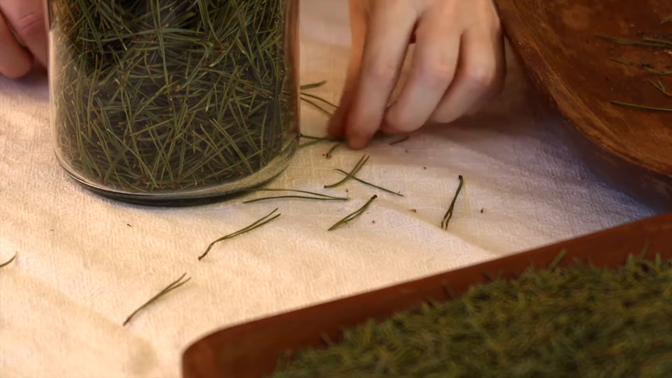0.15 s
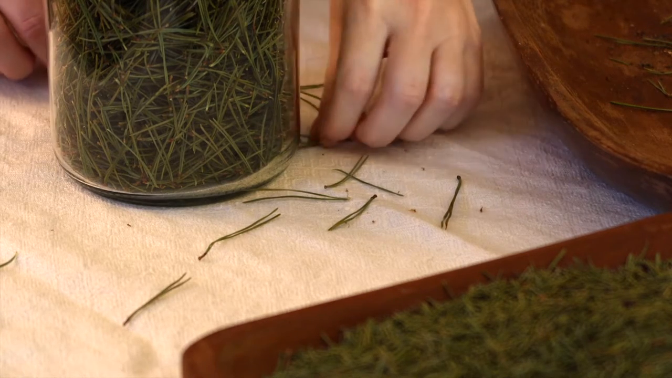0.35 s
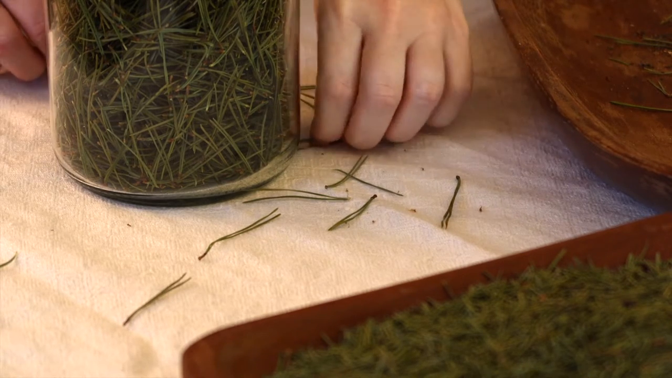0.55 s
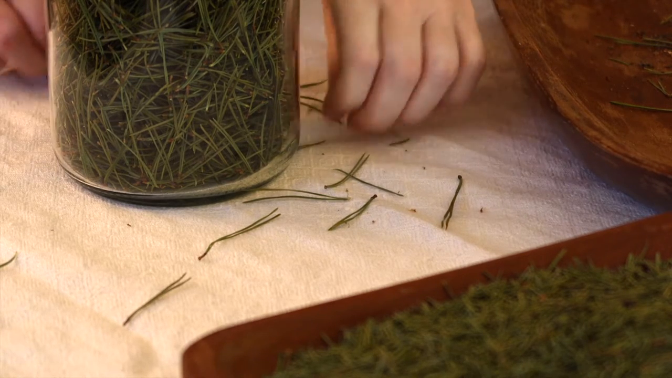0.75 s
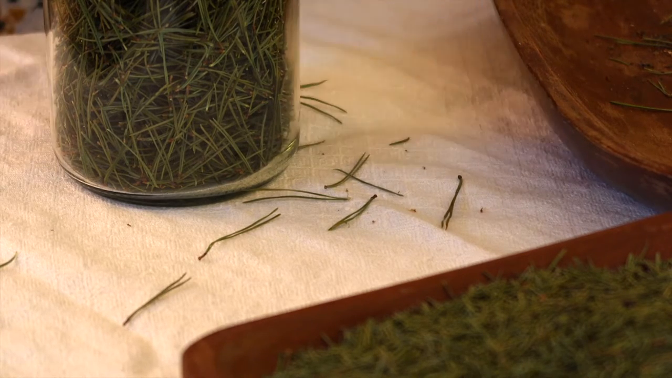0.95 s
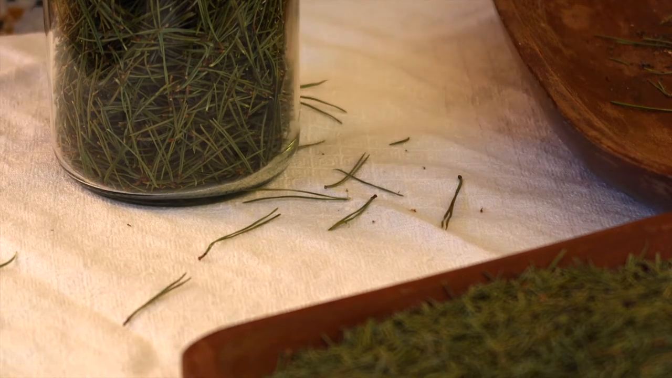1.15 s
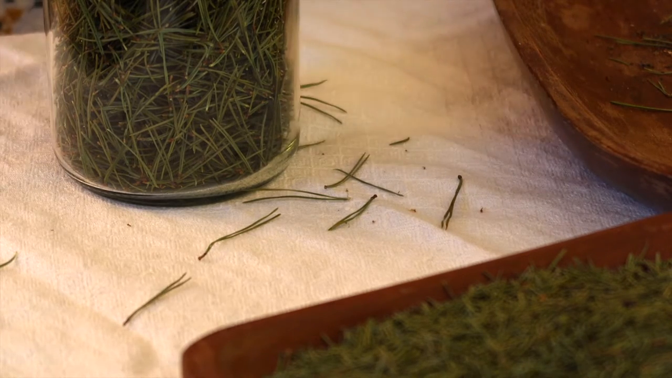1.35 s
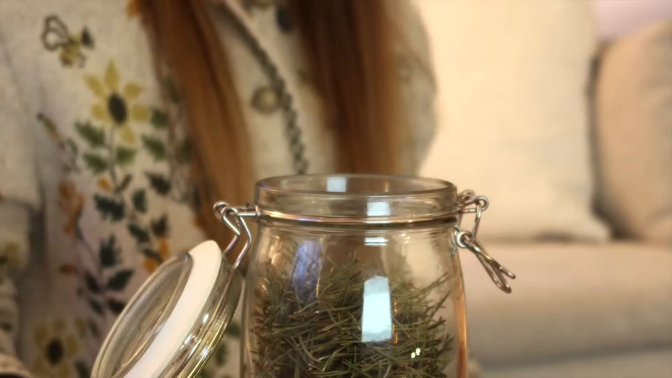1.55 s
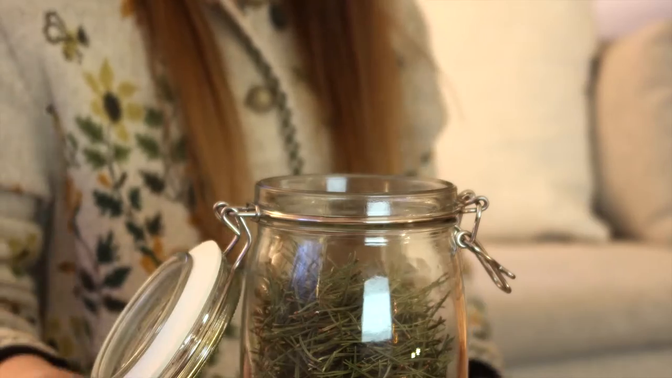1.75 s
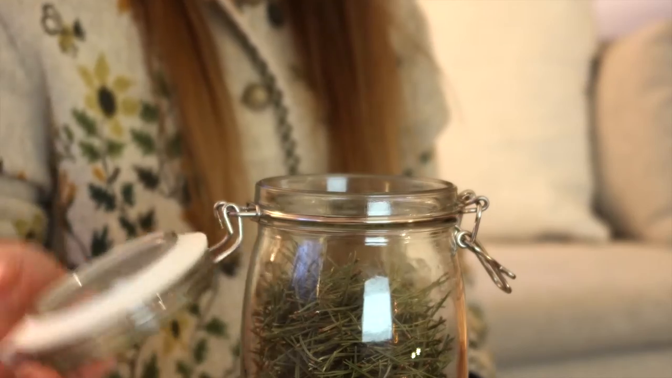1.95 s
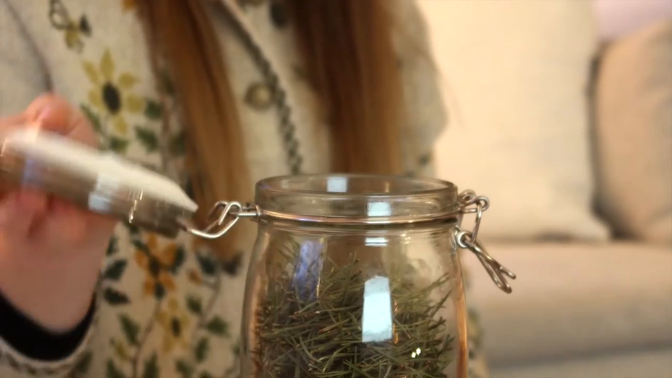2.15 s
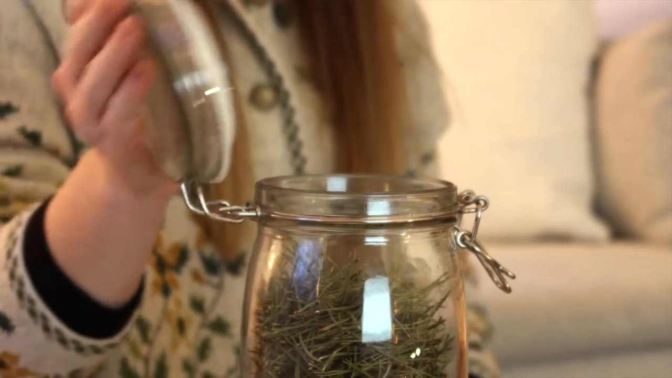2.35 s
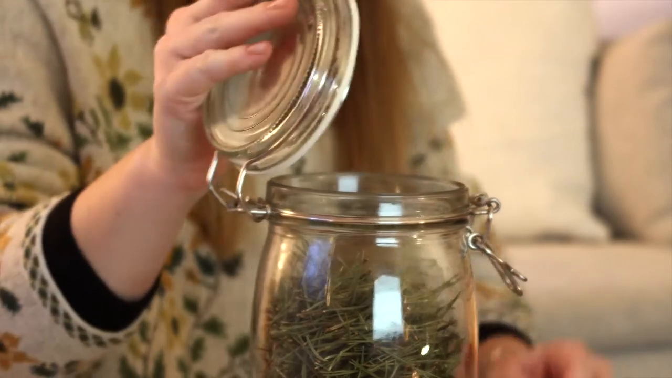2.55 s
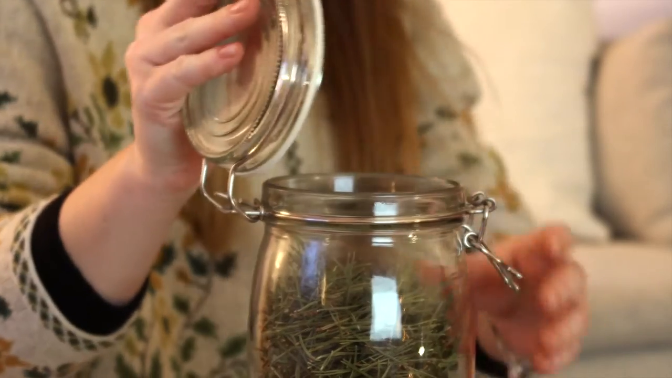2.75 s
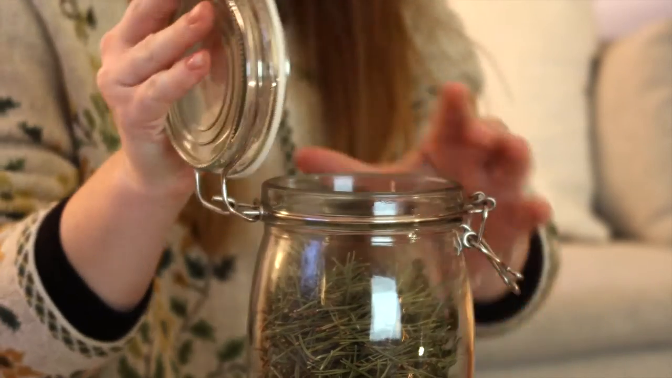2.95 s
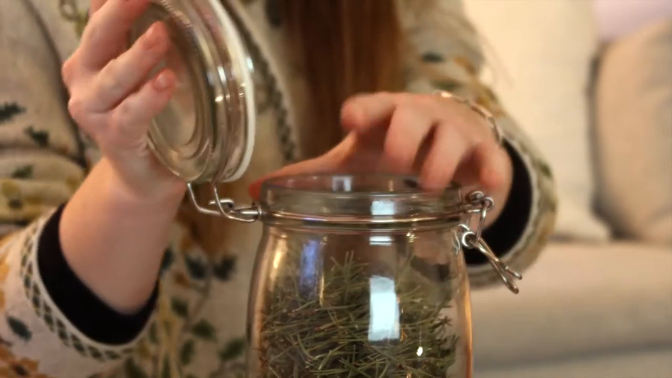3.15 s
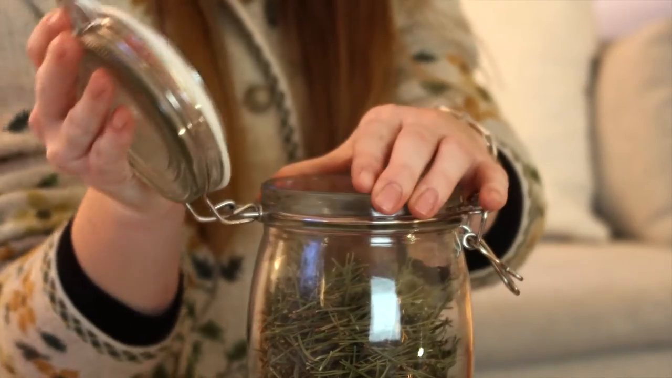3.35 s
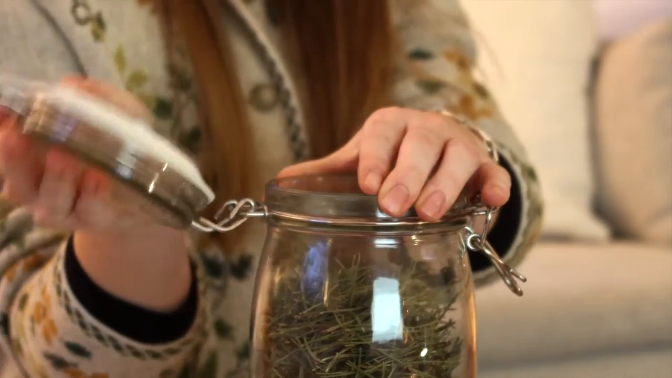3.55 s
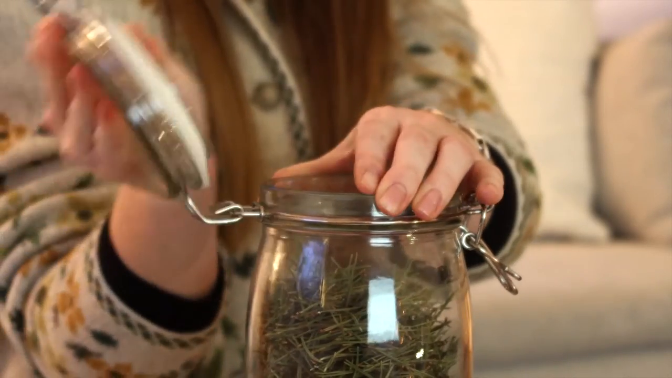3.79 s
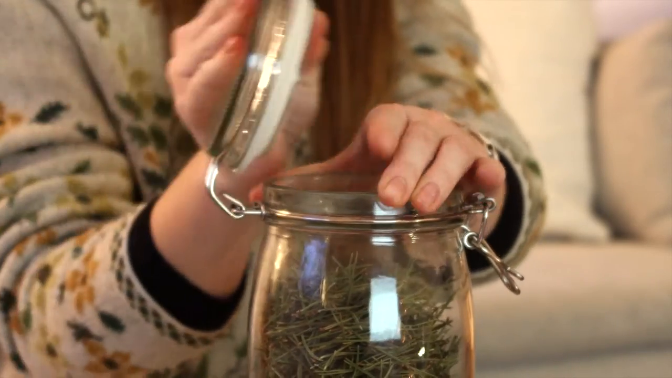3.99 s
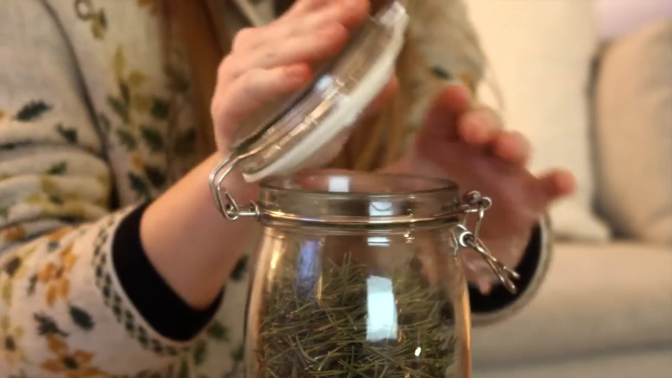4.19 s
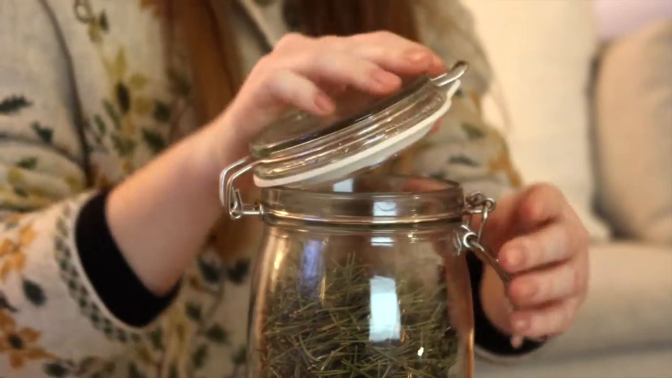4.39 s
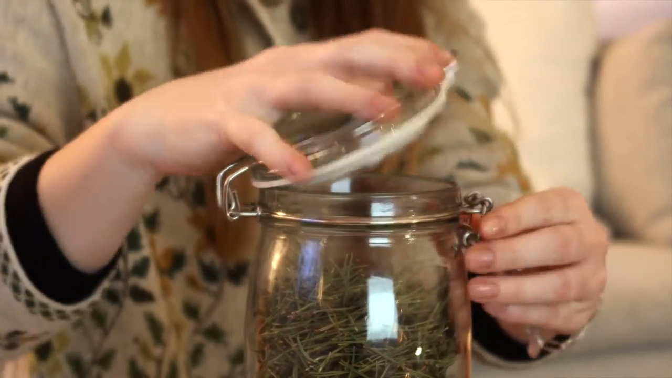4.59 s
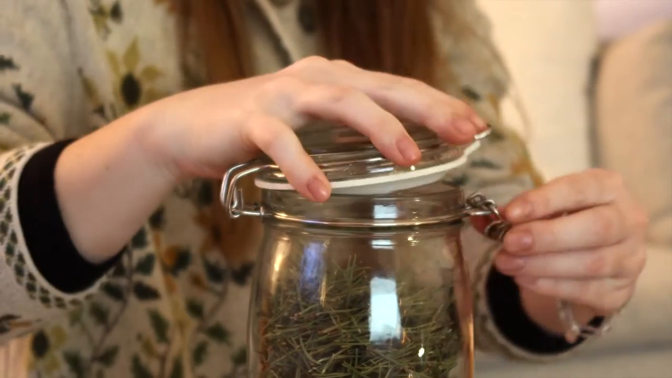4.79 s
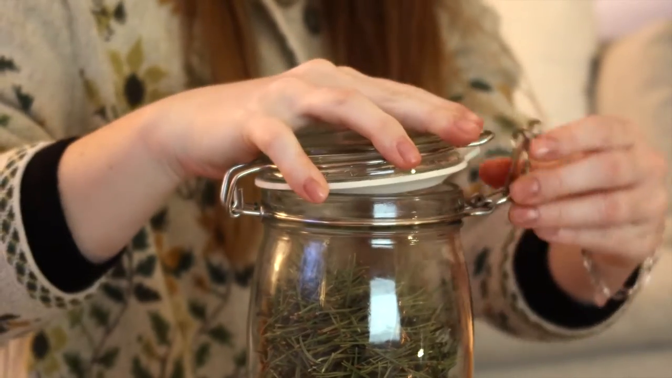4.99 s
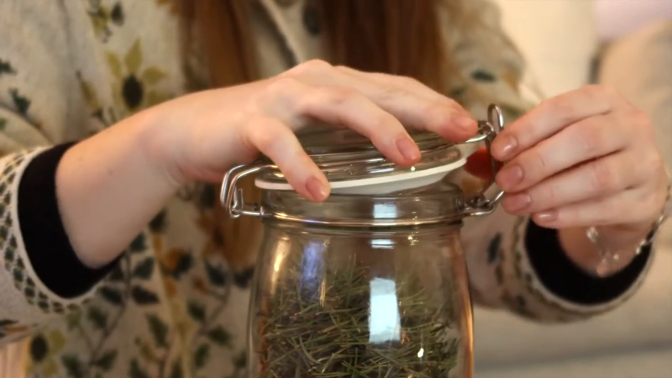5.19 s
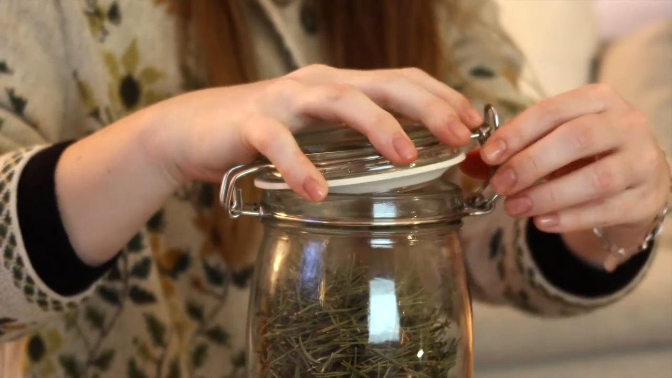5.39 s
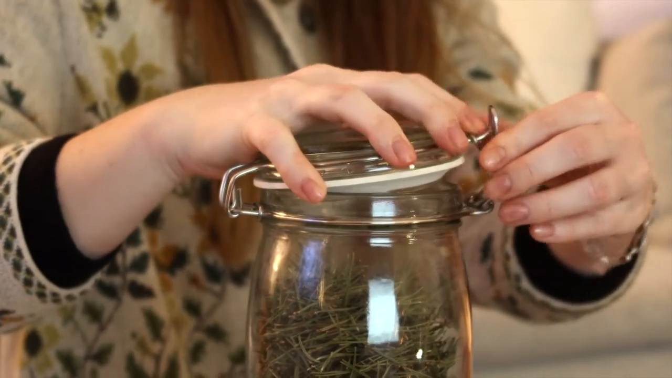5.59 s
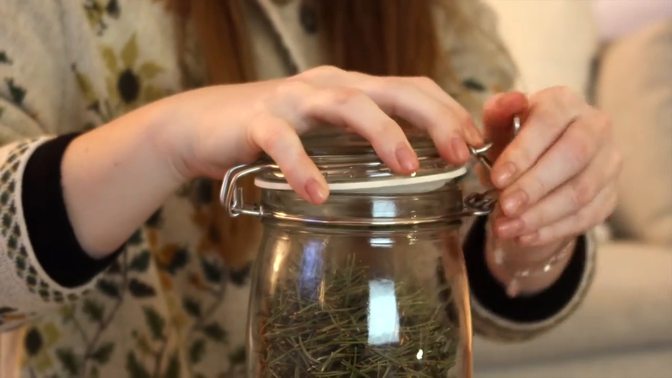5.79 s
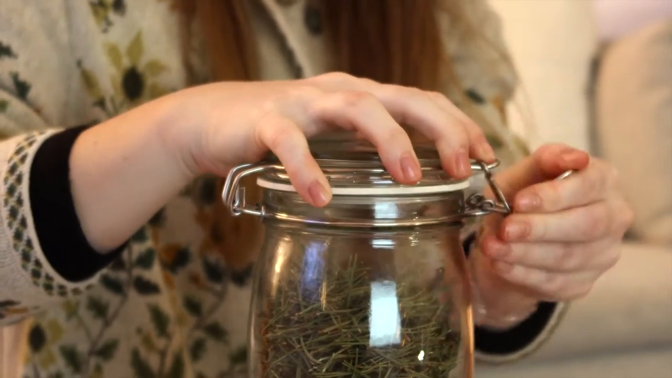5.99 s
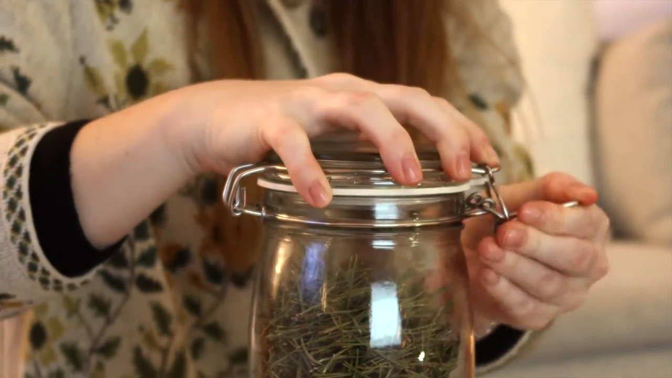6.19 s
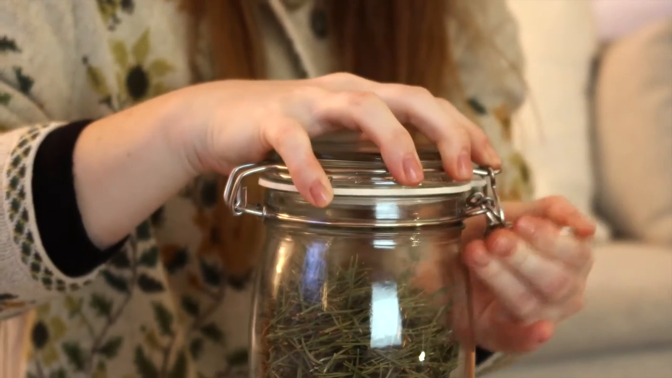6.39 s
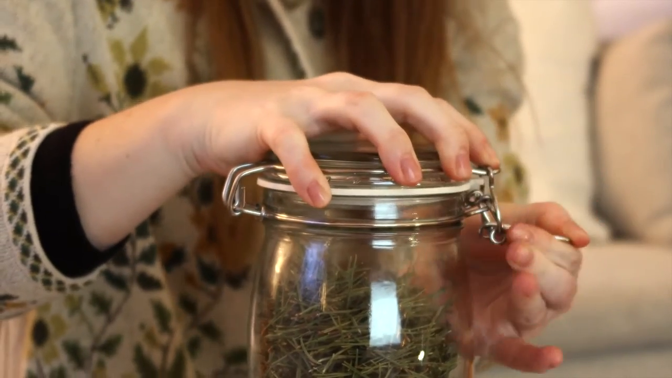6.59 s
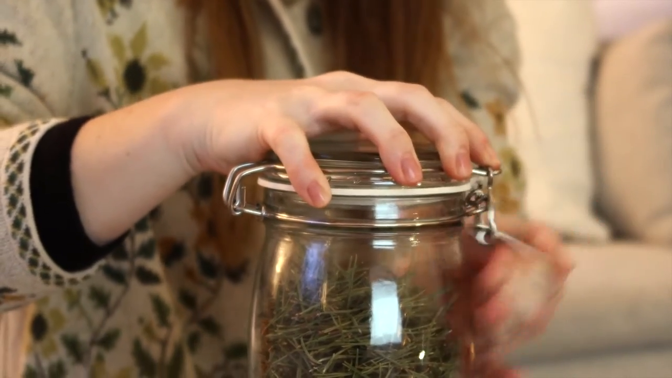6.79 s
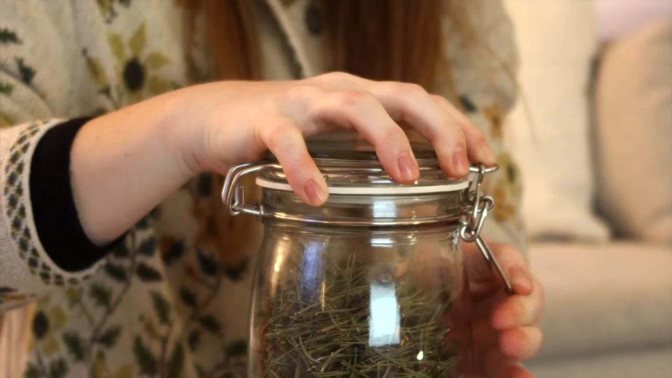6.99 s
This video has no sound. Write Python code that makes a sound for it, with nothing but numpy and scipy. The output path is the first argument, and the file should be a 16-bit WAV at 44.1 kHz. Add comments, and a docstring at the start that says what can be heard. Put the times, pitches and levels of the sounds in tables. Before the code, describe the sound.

Faint skin-on-cloth rustle and tiny needle crackles come first, over steady soft room air. After a pause, a glass jar lid swings on its wire hinge with short bright clinks and low table bumps, then settles with small taps and wire scrapes. One hard metallic snap stands far above everything, followed by a lever knocking the glass. Close microphone, short indoor echo.

```python
"""A hand brushes over a tablecloth in a small, quiet room, with needles crackling and nails ticking close by.
Then the hinged glass lid of a jar of pine needles is swung shut: lid, hinge and wire clasp tap and grind on
the glass, the rubber seal groans, the clasp snaps over its catch and the lever drops against the jar.
Glass, wire and wood ring as sums of decaying modes, coloured on the glass by the spot that is struck;
cracks, scratches and knocks are short puffs of coloured noise. The jar also shakes the wooden table under it."""
import sys
import numpy as np
from scipy import signal
from scipy.fft import rfft, irfft, next_fast_len
from scipy.io import wavfile

SR = 44100
rng = np.random.default_rng(int(sys.argv[2]) if len(sys.argv) > 2 else 0)


def store_pcm(level_fs):
    """Save levels as 16-bit WAV."""
    pcm = np.round(np.clip(level_fs, -1, 1) * 32767).astype(np.int16)
    wavfile.write(sys.argv[1], SR, np.atleast_2d(pcm).T)


N = 310596
TIME = np.arange(N) / SR

# the hand sweeps over the cloth: (time [s], level [dB])
SWEEP = [(0, -87), (.25, -73.5), (.46, -59.5), (.52, -71), (1.0, -80.5), (1.42, -77), (1.7, -95)]
# lid, hinge or clasp strikes the glass: (time [s], strength [dB], brightness [dB per octave],
# nearness to the rim [dB], lid against jar [dB], hardness [dB])
CLINKS = [(2.4805, -51, 4, -3, -1, 1), (2.5056, -52.5, 4, -6, 2.5, -4),
          (2.652, -34.5, 1.5, -11.5, 6.5, -0.5), (2.7477, -40.5, 1.5, 4, 2, -0.5),
          (3.2261, -67.5, -6, -9, 3, 5.5), (3.2765, -68.5, 0, 7, 6.5, 1), (3.488, -62, 1.5, -5, 0, -1),
          (3.5498, -39, -2, -15, -5.5, 8), (3.5734, -47.5, 0, -3, -13, -1), (3.5884, -48, -1, 3, -2, -6),
          (3.6551, -51, 7, 21, 0, 2), (3.6655, -49.5, -4, -2, 9, 5.5), (4.0213, -64.5, -0.5, -1, 0, 0),
          (4.0783, -62.5, 1.5, -3, 5, -7), (4.129, -64, -3, 6, 1.5, 1), (4.2051, -49.5, -1, -0.5, 0, -5.5),
          (4.5775, -42.5, -1, 5, -1.5, -8), (4.5985, -48.5, -1.5, -9, 8, -3), (4.611, -48.5, -0.5, 0, 8, 3),
          (4.6564, -58, -1, -6, 2, -6), (4.7037, -56.5, 2.5, 13, 1, -3), (4.7207, -56, 5.5, 4, 7.5, 1),
          (4.7364, -58, -11.5, 16, 5.5, -2), (4.7855, -63, 5, 12, -1, 5), (4.8254, -54, 1.5, 6.5, -3, 0),
          (4.9866, -58, -0.5, 7.5, -10, 4), (4.9974, -62, -14, 15.5, 3, -8),
          (5.1562, -43, -2, -7.5, 1, -0.5), (5.2505, -67.5, -7, -3, 9, 4), (5.2962, -54.5, 6.5, 2, 2, 2.5),
          (5.3331, -58, -6, 5, 5.5, -9), (5.4365, -67, -1, -3, 9, -4), (5.5212, -62, -5, -11, 2.5, -13),
          (5.5647, -49, 0, -11, 1.5, 1), (5.5994, -57, -13, -1.5, -3.5, 2), (5.7401, -48, -4, 7, -5, 1),
          (5.8646, -73, 6, 13, 8, -5), (5.9719, -58, -6.5, -2, 4, -4), (6.4674, -24, -2, 6, 0, 0.5),
          (6.8619, -52, -5, -3.5, 6.5, 7), (6.8799, -48, -11, 14.5, 2, 7.5),
          (6.9218, -30.5, 0.5, 7, 3.5, 6.5)]
# modes of jar and lid: (frequency [Hz], level [dB], t60 [s])
GLASS_MODES = [(1310, -10.5, 0.11), (1333.7, -3.5, 0.1), (2112, -6.5, 0.061), (2163.5, -1, 0.053),
               (3669, 1.5, 0.065), (4750, -2.5, 0.036), (4770, -11.5, 0.075), (4938, -1.5, 0.057),
               (4987, -5, 0.081), (5760, -14.5, 0.023), (6130, -3.5, 0.055), (6570, -4.5, .06),
               (7820, -1, 0.056), (7870, -19, 0.076), (9610, -4, 0.05), (10250, -5, 0.022),
               (11050, -5, 0.022), (11950, -9, 0.05), (12785, -4, 0.026), (13684, -8.5, .04),
               (14276, -16.5, .04), (14950, -12, 0.04)]
# colour of a hard crack: (frequency [Hz], level [dB per Hz])
CRACK_COLOUR = [(60, -39.5), (200, -37.5), (700, -14.5), (1500, 1), (2500, -7.5), (3300, 6), (4050, -2),
                (4700, 7), (5600, -9.5), (7100, -18.5), (9500, -15.5), (15000, -28.5)]
# colour of wire scratching on glass: (frequency [Hz], level [dB per Hz])
SCRAPE_COLOUR = [(300, -10), (900, -9.5), (1330, -6.5), (1700, -2.5), (2200, 8), (3200, -7), (4900, -16),
                 (7000, -23.5), (15000, -17.5)]
RESTING_DB = -87  # effort of the hands between moves


def from_db(db):
    """Decibels as an amplitude factor."""
    return 10 ** (np.asarray(db) / 20)


def rms_one(x):
    """Scales a signal to rms 1."""
    return x / np.sqrt(np.mean(x ** 2) + 1e-20)


def gain_in_time(rows):
    """A level curve as a gain for every sample."""
    return from_db(np.interp(TIME, *np.transpose(rows)))


def at_hz(points, hz):
    """Reads a table on a log-frequency axis."""
    known_hz, values = np.transpose(points)
    return np.interp(np.log(np.maximum(hz, 1)), np.log(known_hz), values)


def noise(spectrum):
    """Noise of a given colour, rms 1."""
    size = next_fast_len(N)
    colour = from_db(at_hz(spectrum, np.fft.rfftfreq(size, 1 / SR)))
    white = rng.standard_normal(size)
    return rms_one(irfft(rfft(white) * colour, size)[:N])


def clicks(times, levels_db):
    """One impulse for each contact."""
    out = np.zeros(N)
    samples = np.round(np.asarray(times) * SR).astype(int)
    out[np.clip(samples, 0, N - 1)] = from_db(levels_db)
    return out


def decay_per_sample(t60):
    """The factor that loses 60 dB in t60 seconds."""
    return from_db(-60 / (t60 * SR))


def ring(force, hz, t60):
    """One mode as a two-pole resonator: a unit click sets a decaying sine of height 1 ringing."""
    r, w = decay_per_sample(t60), 2 * np.pi * hz / SR
    return signal.lfilter([0, r * np.sin(w)], [1, -2 * r * np.cos(w), r * r], force + 1e-18)


def burst(force, spectrum, t60, rise_t60=0.0011):
    """Crowded, heavily damped modes: each click leaves a puff of noise that swells and dies."""
    fall, rise = decay_per_sample(t60), decay_per_sample(rise_t60)
    swell = signal.lfilter([1 - rise], [1, -rise], force + 1e-18)
    envelope = signal.lfilter([1], [1, -fall], swell)
    return noise(spectrum) * envelope


def room_tone(level_db=-65.5):
    """Steady coloured noise: the air of the quiet room."""
    # (frequency [Hz], level [dB per Hz])
    air_colour = [(12, -29), (20, 2), (27, 2.5), (133, -1.5), (171, -7), (372, -7), (491, -10), (958, -8),
                  (1230, -12.5), (1340, -13), (2400, -15.5), (3170, -16), (15500, -22)]
    return from_db(level_db) * noise(air_colour)


def rumble(rest_db=-76.5, move_db=-2.0, sweep_db=-1.5, attack_s=0.051, release_s=0.11):
    """The hands keep the table rumbling faintly, more when they sweep the cloth or work the jar."""
    # (frequency [Hz], level [dB per Hz])
    rumble_colour = [(40, -12.5), (110, -24), (170, 3), (260, -1.5), (380, -13.5), (1000, -18.5),
                     (3000, -41)]
    working = from_db(move_db) * effort(attack_s, release_s)
    sweeping = from_db(sweep_db) * gain_in_time(SWEEP)
    pushing = np.hypot(working, sweeping)
    return np.hypot(from_db(rest_db), pushing) * noise(rumble_colour)


def fingers(tick_db=-4.5, tick_t60=0.019, grain_db=2.5, needles_per_s=70, needle_db=2.5,
            needle_spread_db=0.0, needle_t60=.005):
    """Skin catches on the threads of the cloth as it sweeps and loose needles crackle under it; nails tick."""
    # dry ticks of needles and fingernails, before tick_db: (time [s], level [dB])
    ticks = [(0.471, -45.5), (0.549, -51.5), (0.8148, -51), (1.949, -49), (2.5466, -44.5), (3.907, -49.5),
             (6.243, -50.5), (6.274, -51.5)]
    # colours of a dry tick and of skin on cloth: (frequency [Hz], level [dB per Hz])
    tick_colour = [(400, -5.5), (1000, 0), (1800, -2.5), (3500, -2), (5500, -7.5), (9000, -20),
                   (16000, -13)]
    cloth_colour = [(180, -27), (300, -12.5), (396, -12), (680, -9.5), (750, -13), (1520, -20.5),
                    (2820, -16.5), (15000, -45)]
    times, levels_db = np.transpose(ticks)
    # slow random swings of level make the weave uneven
    threads = from_db(grain_db * noise([(100, 0), (1000, -40), (10000, -100)]))
    brush = rms_one(threads * noise(cloth_colour))
    needle_sizes_db = needle_db + needle_spread_db * np.minimum(rng.exponential(1, N), 2)
    snaps = (rng.random(N) < needles_per_s / SR) * from_db(needle_sizes_db)
    crackle = burst(snaps, tick_colour, needle_t60)
    sweep = gain_in_time(SWEEP) * (brush + crackle)
    return sweep + burst(clicks(times, levels_db + tick_db), tick_colour, tick_t60)


def table(thump_db=2.5, knock_db=-1.0, knock_t60=0.056, cloth_hz=300, shake_db=-31, shake_follows=0.51,
          shake_knock_db=-6.0, shake_limit_db=-51.0):
    """Bumps knock on the wood and ring its low modes; every clink shakes it a little through the jar."""
    # hand or jar bumps the table, before the overall levels: (time [s], thump [dB], knock [dB])
    bumps = [(0.446, -44, -47.5), (0.469, -57, -55), (0.551, -49, -59), (1.891, -59, -61.5),
             (2.073, -53, -73), (2.498, -48.5, -55.5), (2.649, -46, -53.5), (3.231, -43, -66),
             (3.549, -36, -40), (3.829, -54, -70), (4.611, -48.5, -61), (4.732, -50, -77),
             (5.162, -52, -60), (5.564, -43, -58), (6.276, -60.5, -57), (6.345, -63, -60.5),
             (6.863, -39.5, -36.5), (6.88, -37, -36.5)]
    # modes of the table: (frequency [Hz], level [dB], t60 [s])
    table_modes = [(70, -15.5, 0.23), (148, -11, 0.074), (209, -2, 0.085), (249, -2.5, 0.067),
                   (338, -9.5, 0.044)]
    # colour of a knock on the wood: (frequency [Hz], level [dB per Hz])
    knock_colour = [(30, -16.5), (70, -7), (200, -0.5), (400, 2), (650, -2), (1000, -4.5), (2000, -21),
                    (5000, -45)]
    times, thumps, knocks = np.transpose(bumps)
    # the shaking grows by shake_follows dB per dB of drive, up to a limit
    drive_db = struck_db(CLINKS, GLASS_MODES[0][0])[:, 0]
    shakes_db = np.minimum(shake_db + shake_follows * drive_db, shake_limit_db)
    shakes = clicks(np.transpose(CLINKS)[0], shakes_db)
    # the tablecloth softens each push
    soften = signal.butter(2, cloth_hz, fs=SR, output="sos")
    force = signal.sosfilt(soften, clicks(times, thumps + thump_db) + shakes + 1e-18)
    # neighbouring modes start in opposite directions
    thump = sum((-1) ** k * from_db(db) * ring(force, hz, t60) for k, (hz, db, t60) in enumerate(table_modes))
    knocking = clicks(times, knocks + knock_db) + from_db(shake_knock_db) * shakes
    return thump + burst(knocking, knock_colour, knock_t60)


def effort(attack_s, release_s):
    """How hard the hands work, as a gain: each move swells, holds and fades exponentially."""
    # moves of the hands on the jar: (start [s], length [s], level [dB])
    moves = [(2.43, 0.11, -70.5), (3.24, 0.12, -74.5), (3.57, 0.11, -61), (4.029, 0.096, -67),
             (4.579, 0.17, -64.5), (4.86, .22, -69), (5.235, 0.17, -63), (5.533, 0.46, -65)]
    out = from_db(RESTING_DB)
    for start, length, db in moves:
        before = np.maximum(start - TIME, 0) / attack_s
        after = np.maximum(TIME - start - length, 0) / release_s
        out = np.maximum(out, from_db(db) * np.exp(-np.minimum(before + after, 20)))
    return out


def rubbing(rub, slips_per_s=220, spread_db=1.0, treble_loss_db=17.0, ring_db=-2.5, scrape_db=-6.5,
            scrape_t60=0.0087):
    """Tiny random slips of wire on glass scratch and excite the glass modes, mostly the low ones."""
    slips = np.flatnonzero(rng.random(N) < slips_per_s / SR) / SR
    sizes_db = spread_db * np.minimum(rng.exponential(1, len(slips)), 3)
    rings = 0
    for hz, mode_db, t60 in GLASS_MODES:
        # treble_loss_db is lost for each factor e in frequency
        dull_db = -treble_loss_db * np.log(hz / GLASS_MODES[0][0])
        scatter_db = rng.normal(0, 2.35, len(slips))
        rings = rings + ring(clicks(slips, sizes_db + mode_db + dull_db + scatter_db), hz, t60)
    scrape = burst(clicks(slips, 2 * sizes_db), SCRAPE_COLOUR, scrape_t60)
    return rub * (from_db(ring_db) * rms_one(rings) + from_db(scrape_db) * rms_one(scrape))


def slides(lead_s=0.0061, level_db=0.0, t60=0.049, clean_db=-41.5):
    """Wire slides for a moment before it catches; only blows of clean_db or more land cleanly."""
    times, strength_db, *_, hardness_db = np.transpose(CLINKS)
    gentle = strength_db < clean_db
    levels_db = (strength_db + hardness_db)[gentle] + level_db
    return burst(clicks(times[gentle] - lead_s, levels_db), SCRAPE_COLOUR, t60, rise_t60=0.028)


def struck_db(contacts, hz, rim_hz=3730, rim_width_octaves=0.74, rim_balance=0.43):
    """How strongly each contact drives each frequency: its strength, its brightness and the spot that it hits."""
    # whether the modes belong more to the lid (+) or to the jar (-): (frequency [Hz], share)
    lid_share = [(1330, -0.62), (2140, 1), (3666, -0.64), (4750, 0.44), (6200, 0.57), (9000, -0.17)]
    # colour of an average contact: (frequency [Hz], level [dB])
    contact_colour = [(1320, -1), (2140, 0), (3666, 1), (4850, 4), (6200, -4.5), (8000, -2.5), (9600, -2.5),
                      (12000, -2.5), (15000, -0.5)]
    _, strength, brightness, rim, lid, _ = np.transpose(contacts)[:, :, None]
    octaves = np.log2(np.atleast_1d(hz) / rim_hz)
    # a blow on the rim favours the modes round rim_hz; a blow elsewhere spares them
    near_rim = np.exp(-(octaves / rim_width_octaves) ** 2) - rim_balance
    spot = rim * near_rim + lid * at_hz(lid_share, hz)
    return strength + brightness * octaves + spot + at_hz(contact_colour, hz)


def glass(contacts, ring_db=3.0, crack_db=-1, crack_follows=0.86, crack_t60=0.014, crack_rise_t60=0.0046,
          build_t60=0.0086, scatter_db=2.5, overtone_scatter_db=4.5, overtone_db=-6.0, detune=0.0033,
          overtone_detune=0.007, splash_db=-1.0, splash_t60=0.032, splash_rise_t60=0.0059):
    """Every contact cracks and sets the modes ringing; they swell for a moment as the wave runs round the jar."""
    # two crowds of weak overtones: (frequency [Hz], level [dB per Hz])
    low_splash = [(3500, -39.5), (5500, -1.5), (6400, 5), (7100, -20), (8200, 1.5), (10000, -22)]
    high_splash = [(6500, -32.5), (9000, -5.5), (11000, 3), (15000, -5), (17000, -10)]
    # centres of the two crowds [Hz]
    splash_hz = [7000, 11400]
    times, strength_db, *_, hardness_db = np.transpose(contacts)
    hz, mode_db, t60 = np.transpose(GLASS_MODES)
    overtone = hz > 5900
    # the crack grows by crack_follows dB per dB of strength
    crack_force = clicks(times, crack_db + crack_follows * strength_db + hardness_db)
    crack = burst(crack_force, CRACK_COLOUR, crack_t60, crack_rise_t60)
    # between the strong overtones lie many weak ones that merge into a splash
    splash = 0
    for db, colour in zip(struck_db(contacts, splash_hz).T, (low_splash, high_splash)):
        splash = splash + burst(clicks(times, db + splash_db), colour, splash_t60, splash_rise_t60)
    t = TIME[:SR // 5]
    fading = np.exp(-np.log(1000) * t / t60[:, None])
    envelopes = fading - np.exp(-np.log(1000) * t / build_t60)
    rings = np.zeros(N + len(t))
    for s, drive_db in zip(times, struck_db(contacts, hz)):
        strength, grip, phase = rng.standard_normal((3, len(hz)))
        # short waves depend most on the exact spot
        spot_db = np.where(overtone, overtone_db + overtone_scatter_db * strength, scatter_db * strength)
        # the grip of the hand pulls every mode a little
        held_hz = hz * (1 + np.where(overtone, overtone_detune, detune) * grip)
        waves = np.sin(2 * np.pi * (held_hz[:, None] * t + (overtone * phase)[:, None]))
        start = int(s * SR)
        rings[start:start + len(t)] += from_db(drive_db + mode_db + ring_db + spot_db) @ (envelopes * waves)
    return rings[:N] + crack + splash


def rattles(rub, per_s=16, level_db=-4.5, spread_db=4, tilt_db=3.0, spot_db=3.5):
    """Light random touches of the loose wire while it is moved, following the rubbing; rows like CLINKS."""
    when, chance = rng.random((2, 256))  # candidates, thinned out to the rate below
    size, tilt, rim, lid, hardness = rng.standard_normal((5, len(when)))
    rub_db = 20 * np.log10(rub[(when * N).astype(int)])
    strength_db = rub_db + level_db + spread_db * size
    rows = np.transpose([when * N / SR, strength_db, tilt_db * tilt, spot_db * rim, spot_db * lid, hardness])
    chosen = chance < per_s * N / SR / len(when)
    moving = rub_db > RESTING_DB + 1
    return rows[chosen & moving]


def wire():
    """The steel bail holds its thin notes longer than the glass; the stiff hinge rings higher and shorter."""
    # the springy bail is plucked, the hinge runs against its stop: (time [s], level [dB])
    twangs = [(2.654, -48), (3.664, -48.5), (4.826, -56.5), (5.158, -56), (6.467, -36), (6.924, -48)]
    hinge_stops = [(3.551, -32.5)]
    # modes of bail and hinge: (frequency [Hz], level [dB], t60 [s])
    bail_modes = [(2392, -.5, .21), (3673, -4.5, .34)]
    hinge_modes = [(5577, -0.78, 0.042), (9600, 0, 0.061)]
    out = 0
    for blows, modes in ((twangs, bail_modes), (hinge_stops, hinge_modes)):
        force = clicks(*np.transpose(blows))
        out = out + sum(from_db(db) * ring(force, hz, t60) for hz, db, t60 in modes)
    return out


def seal(rough=0.55):
    """The rubber seal groans as the lid is pressed on it: it sticks and slips, slower as it settles."""
    # (time [s], pitch [Hz], level [dB])
    groan = [(5.885, 175.4, -87), (5.911, 151, -56), (5.945, 136, -53), (5.975, 128, -61), (6.01, 125, -89)]
    times, pitch_hz, level_db = np.transpose(groan)
    phase = 2 * np.pi * np.cumsum(np.interp(TIME, times, pitch_hz)) / SR
    unsteady = 1 + rough * noise([(40, 0), (200, -40), (2000, -100)])
    pressed = (TIME > times[0]) & (TIME < times[-1])
    return pressed * from_db(np.interp(TIME, times, level_db)) * unsteady * np.sin(phase)


def clasp(crack_db=1.5, crack_t60=0.0098, lowest_hz=300):
    """The tensed clasp jumps over its catch: one abrupt, hard snap of heavily damped modes and a crack."""
    # the clasp springs over its catch: (time [s], level [dB])
    catch = [(6.4682, -11.5)]
    # (frequency [Hz], level [dB], t60 [s])
    clasp_modes = [(684, -24.5, 0.053), (1018, -20, 0.011), (3300, 1.5, 0.0061), (4450, -1, 0.014)]
    force = clicks(*np.transpose(catch))
    rings = sum(from_db(db) * ring(force, hz, t60) for hz, db, t60 in clasp_modes)
    snap = rings + from_db(crack_db) * burst(force, CRACK_COLOUR, crack_t60)
    # thin wire radiates no bass
    return signal.sosfilt(signal.butter(2, lowest_hz, "high", fs=SR, output="sos"), snap)


def room(x, first_echo_s=0.004, build_s=0.015, t60=0.33, absorb_hz=16000):
    """Echoes off the room thicken over some milliseconds, then die away, the treble first."""
    # colour of the echo: (frequency [Hz], level [dB])
    echo_colour = [(200, -7.5), (700, -6), (1400, -12), (2200, -8), (2900, -14.5), (3800, -9.5),
                   (5000, -11), (8000, -13.5), (15000, -16)]
    t = TIME[:SR // 2]
    hz = np.fft.rfftfreq(len(t), 1 / SR)
    white = rfft(rng.standard_normal(len(t)))
    onset = np.clip((t - first_echo_s) / build_s, 0, 1)
    centres = np.geomspace(100, 16000, 22)
    nearest = np.abs(np.log((hz[:, None] + 1) / centres)).argmin(axis=1)
    response = 0
    for k, centre in enumerate(centres):
        in_band = nearest == k
        # t60 holds for the bass; at absorb_hz it is halved
        decay = onset * np.exp(-np.log(1000) * t * (1 + (centre / absorb_hz) ** 2) / t60)
        echo = irfft(white * in_band, len(t)) * decay
        # each band returns a set share of the energy that it receives
        share = np.sqrt(np.mean(in_band)) / np.linalg.norm(echo)
        response = response + from_db(at_hz(echo_colour, centre)) * echo * share
    return signal.fftconvolve(x, response)[:N]


def scene(snap_echo_db=-3.0):
    """Jar, table and hands close to the microphone, their echo, and the steady air of a quiet room."""
    air, snap = room_tone(), clasp()
    rub = effort(attack_s=0.027, release_s=0.048)
    near = slides() + wire() + seal() + table() + rumble() + fingers()
    near = near + glass(np.vstack([CLINKS, rattles(rub)])) + rubbing(rub)
    # the clasp is close to the microphone and sounds drier than the jar
    echo = room(near + from_db(snap_echo_db) * snap)
    return (near + snap + echo + air)[None]


def record(dry, top=.34, cutoff_hz=15750):
    """The loudest peaks are rounded off below top and the treble above cutoff_hz is cut steeply."""
    rounded = dry / (1 + (dry / top) ** 4) ** (1 / 4)
    return signal.sosfilt(signal.ellip(12, .1, 80, cutoff_hz, fs=SR, output="sos"), rounded)


dry = scene()
out = record(dry)
store_pcm(out)
```